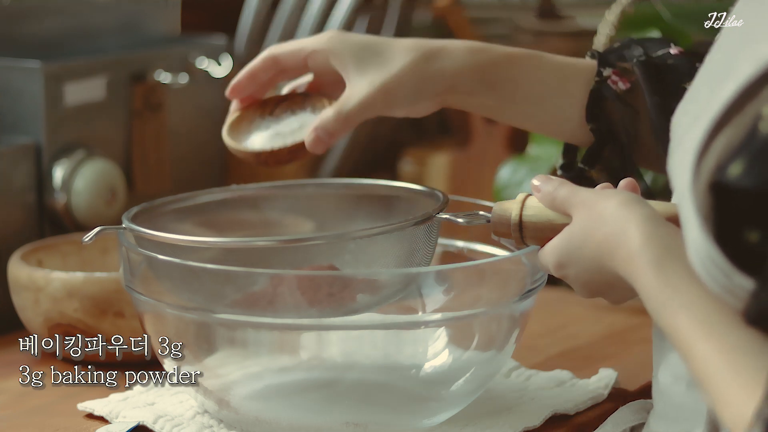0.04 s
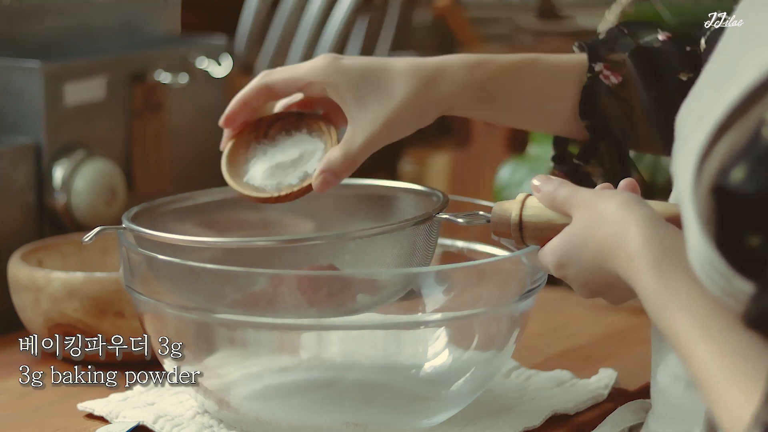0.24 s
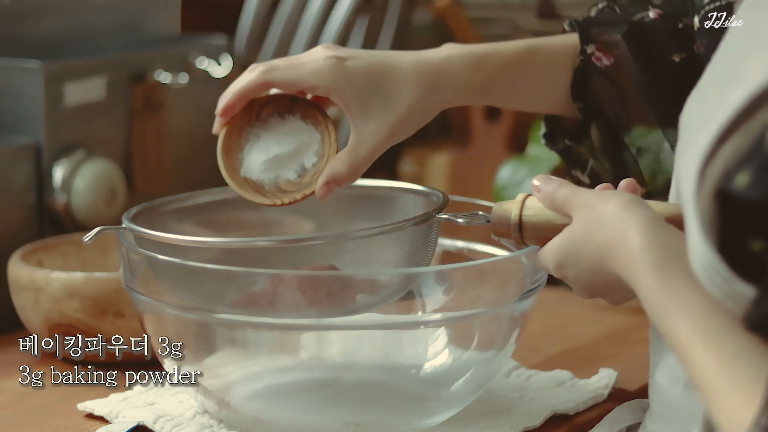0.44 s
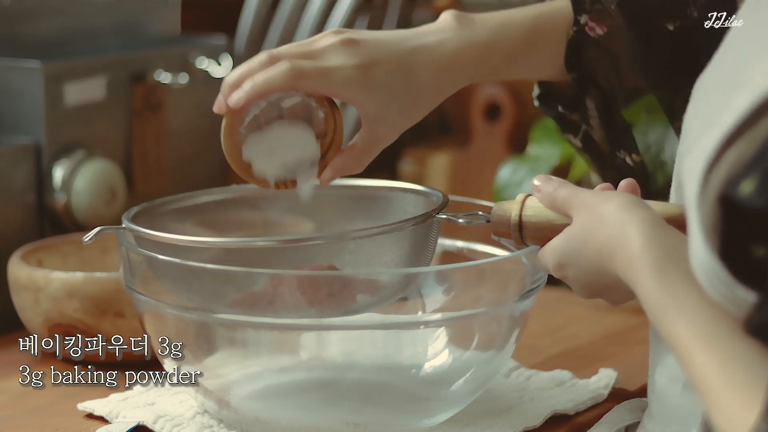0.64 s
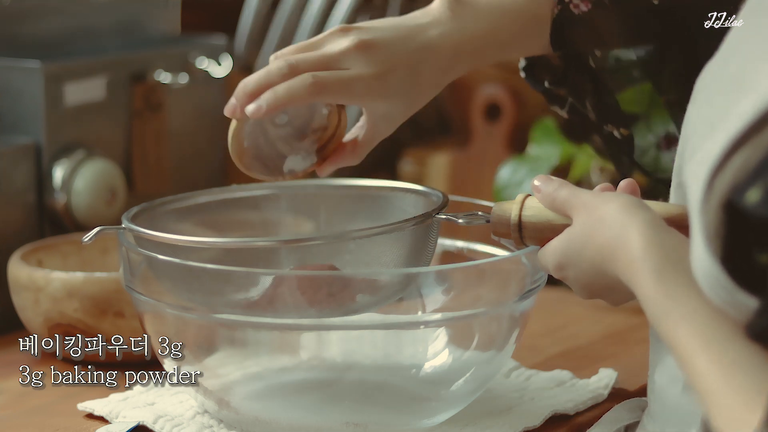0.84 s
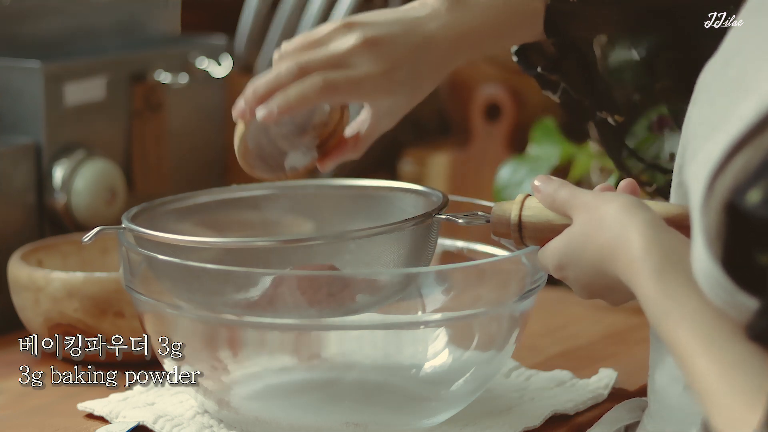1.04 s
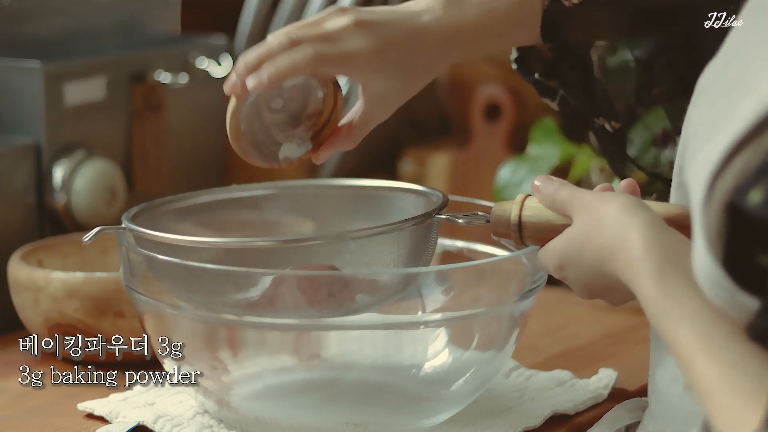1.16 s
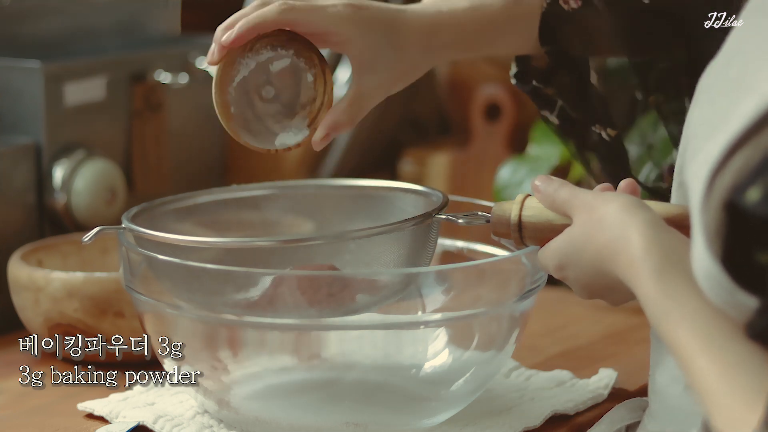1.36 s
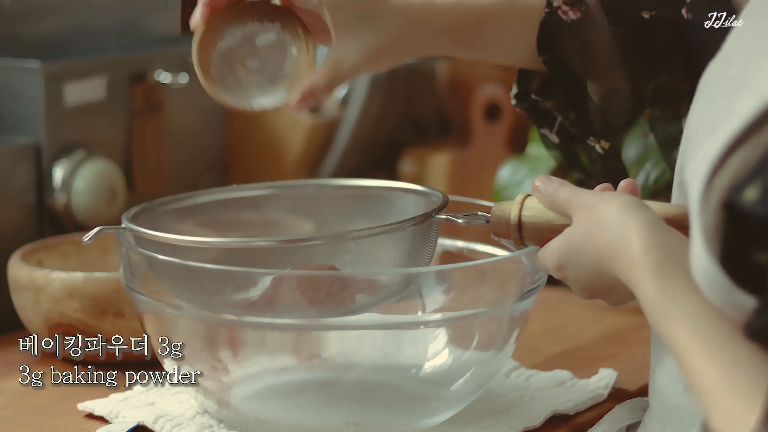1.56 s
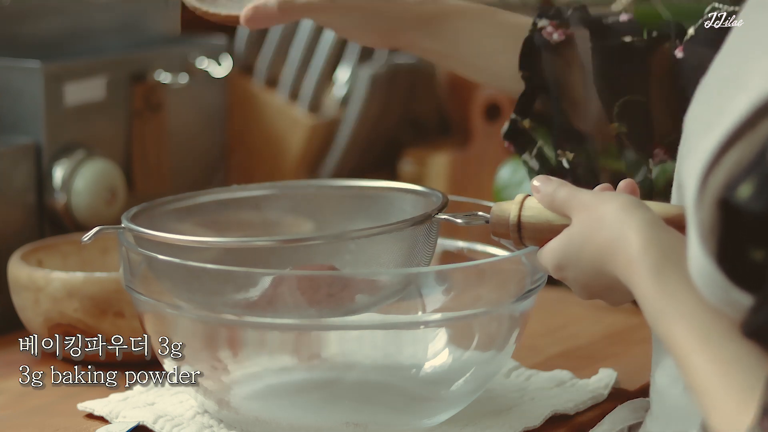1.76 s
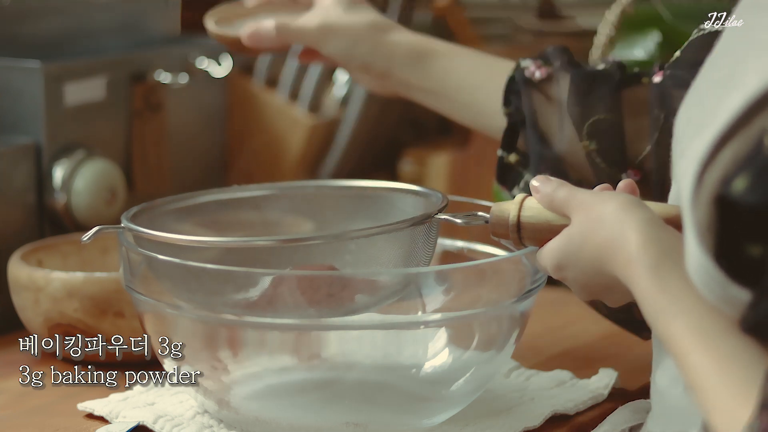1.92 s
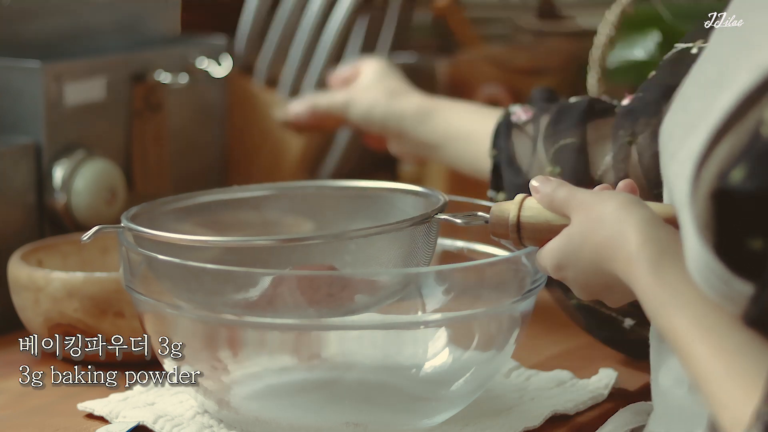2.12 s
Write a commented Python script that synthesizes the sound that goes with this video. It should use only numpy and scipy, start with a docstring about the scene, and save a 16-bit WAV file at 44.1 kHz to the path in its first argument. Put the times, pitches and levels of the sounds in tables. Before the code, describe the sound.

Faint grainy rustles of powder tipped into a sieve, among low knocks on a wooden table.

```python
"""Baking powder is tipped from a small wooden dish into a mesh sieve resting in a glass bowl.
First the powder slides in short grainy rustles, dull knocks boom through the wooden table, and fingers
squeak on the dish and bump it. At one second the powder lands, making sieve and bowl ring.
Then come more knocks, and a thin sleeve swishes as the arm turns. Faint rustles and a few last knocks
follow near two seconds. All along, an appliance hums over the quiet kitchen's low murmur."""
import sys
import numpy as np
from scipy import signal
from scipy.fft import rfft, irfft
from scipy.io import wavfile
from scipy.ndimage import uniform_filter1d

SR = 44100
rng = np.random.default_rng(int(sys.argv[2]) if len(sys.argv) > 2 else 0)


def bounce(signal):
    """Save signal as a 16-bit WAV file at the path given by the first command-line argument."""
    frames = np.transpose(np.atleast_2d(signal))
    limited = np.clip(frames, -1, 1)
    pcm = np.round(limited * 32767).astype(np.int16)
    wavfile.write(sys.argv[1], SR, pcm)


N = 96490

# each slide of powder in the dish (t/s, length/s, level/dB, brightness/dB per octave)
SLIDES = [(0.0, 0.076, -60, 0), (.254, 0.011, -61.5, 1.5), (.27, 0.018, -61, 2.5), (0.311, .01, -60.5, 1),
          (.507, 0.0067, -56.5, 4.5), (.524, 0.018, -59, 2.5), (0.561, 0.062, -65.5, 1),
          (.724, 0.058, -59, 4.5), (0.802, 0.053, -60.5, 3), (.868, 0.02, -65, -0.5),
          (.912, 0.041, -58, 2.5), (0.978, 0.022, -60, 3.5), (1.31, 0.15, -70, -1.5),
          (1.867, 0.062, -71, 4), (1.967, 0.07, -68, 5), (2.043, 0.004, -60, 3.5)]
# the hiss of sliding grains (f/Hz, level/dB)
SLIDE_HISS = [(600, 10), (1300, 3), (2400, -3), (3600, -9.5), (4800, -7.5), (7500, -11), (9500, -22),
              (12500, -19), (15500, -28)]
# where the dish rings in the cupped hand (f/Hz, width/Hz, level/dB)
DISH_RINGS = [(1990, 230, -3), (2470, 260, -1.5), (2950, 130, -0.5), (3430, 360, -1.5), (3975, 270, 0),
              (5970, 120, -8.5)]
def powder_slides():
    """Sliding grains hiss and make the wooden dish ring."""
    hiss = coloured(grains(), SLIDE_HISS)
    dish = from_db(-1) * rms_one(ringing(grains(), DISH_RINGS))
    return bursts(SLIDES, hiss + dish, attack=.006, release=.014)


# each landing of powder in the sieve (t/s, length/s, level/dB, brightness/dB per octave)
LANDINGS = [(.998, 0.044, -52, -2), (1.028, 0.039, -52, 0), (1.082, 0.035, -50.5, -.5)]
# the hiss of grains hitting the mesh (f/Hz, level/dB)
MESH_HISS = [(600, -6), (1200, 0), (1700, -5), (2200, 1), (2800, -4.5), (3800, 2.5), (5500, -4),
             (8000, -10), (12000, -15), (15500, -23)]
# where sieve and bowl ring (f/Hz, width/Hz, level/dB)
SIEVE_RINGS = [(1140, 70, -4), (1403, 60, -7), (2055, 70, -3), (2160, 90, 0), (2498, 50, -3),
               (3060, 90, -7), (3341, 35, 1), (3534, 60, -1), (3843, 45, 5), (3900, 50, 4), (4032, 50, -1),
               (4460, 45, -7)]
def powder_lands():
    """Falling grains hiss on the mesh and set sieve and bowl ringing."""
    hiss = bursts(LANDINGS, coloured(grains(), MESH_HISS), attack=.008, release=.012)
    strikes = bursts(LANDINGS, coloured(grains(), MESH_HISS), attack=.008, release=.012)
    return (hiss + from_db(8) * ringing(strikes, SIEVE_RINGS)) / 2


# each fine spray of powder on the mesh (t/s, length/s, level/dB)
SPRAYS = [(0.36, 0.0069, -59), (.449, .009, -62.5), (0.999, 0.031, -58.5)]
# the hiss of a spray (f/Hz, level/dB)
SPRAY_HISS = [(1000, -4), (2200, 1), (6000, -4.5), (9000, -6.5), (12500, -8.5), (15500, -17)]
def powder_sprays():
    """The finest powder only hisses on the mesh; nothing rings."""
    loudness = sum(from_db(db) * envelope(start, length, attack=.004, release=.0045)
                   for start, length, db in SPRAYS)
    return loudness * coloured(grains(), SPRAY_HISS)


# each dull knock (t/s, level/dB, brightness/dB per octave, extra boom level/dB)
KNOCKS = [(-.01, -41, -1.5, -5.5), (0.238, -49.5, -6, 0.5), (0.374, -60.5, 3.5, 3), (.688, -36, 0.5, -3.5),
          (0.729, -45, 4, -2), (0.783, -44.5, -1, -7), (0.82, -42.5, 3, -13), (0.862, -44, -0.5, -6.5),
          (.906, -43, -6, -7), (1.215, -43, -4.5, -6), (1.27, -45, -19, -5), (1.698, -76, -6, -5),
          (1.992, -33.5, 1, -5), (2.033, -42, 0.5, -3), (2.097, -40, -1, 0), (2.13, -52, -3, -8)]
# the wooden table's own low notes (f/Hz, level/dB, time to fade by 60 dB/s)
TABLE_NOTES = [(91, -8, .7), (114.7, 0, .33), (142, -4, .16), (166, -6, .18), (230, -9, .17),
               (266, -14, .15)]
# the boom in the room (f/Hz, level/dB)
ROOM_BOOM = [(70, 0), (110, 7), (160, -3), (240, -4.5), (320, -16), (500, -24.5), (1000, -47)]
def table_knocks():
    """Each soft push rings the table's low notes and leaves a short boom in the room."""
    push_s, boom_rise_s = .0038, .011
    main_hz = TABLE_NOTES[1][0]
    boom_spectrum = rfft(coloured(white(), ROOM_BOOM))
    out = 0
    for start, db, brightness, boom_db in KNOCKS:
        t = np.maximum(np.arange(N) / SR - start, 0)
        push = from_db(db - 1) * (1 - np.exp(-t / push_s))
        for hz, note_db, fade_s in TABLE_NOTES:
            fading_db = note_db + brightness * np.log2(hz / main_hz) - 60 * t / fade_s
            out += push * from_db(fading_db) * np.sin(2 * np.pi * hz * t)
        boom = evened(tilted(boom_spectrum, brightness), samples=1500)
        swell = envelope(start + boom_rise_s / 2, length=.023, attack=boom_rise_s, release=.044)
        out += from_db(db + boom_db) * swell * boom
    return signal.sosfilt(signal.butter(4, [82, 830], "band", fs=SR, output="sos"), out)


# each swish of the sleeve (t/s, length/s, level/dB, pitch/ratio, boost of all but the lowest ring/dB)
SWISHES = [(1.305, .04, -70.5, 1, 4), (1.36, 0.048, -74, 1, 0), (1.41, 0.078, -67.5, 0.99, 0),
           (1.498, 0.024, -68, 1, -2), (1.592, 0.018, -72, 1, -14), (1.865, 0.051, -67, 0.99, -2),
           (1.982, .065, -76.5, 0.96, 7)]
# where the woven cloth rings (f/Hz, width/Hz, level/dB)
CLOTH_RINGS = [(6200, 340, 0), (8050, 440, -4), (10400, 350, -12), (11600, 450, -11), (13050, 450, -13)]
def sleeve_swishes():
    """Thin cloth rubs unevenly, ringing at a few high pitches that shift a little between strokes."""
    rubbing = signal.sosfilt(signal.butter(2, 4500, "high", fs=SR, output="sos"), white())
    out = 0
    for start, length, db, pitch, boost_db in SWISHES:
        swish = sum(from_db(ring_db + boost_db * (k > 0)) * resonate(rubbing, hz * pitch, width)
                    for k, (hz, width, ring_db) in enumerate(CLOTH_RINGS))
        out += from_db(db) * envelope(start, length, attack=.016, release=.016) * rms_one(swish)
    flutter_db = 1.5 * drift(rate_hz=25)
    return out * from_db(flutter_db)


# each thin squeak (t/s, length/s, level/dB, brightness/dB per octave)
SQUEAKS = [(.435, 0.18, -73, 13), (.708, 0.082, -62.5, 2.5)]
# the pitches in a squeak (f/Hz, width/Hz, level/dB)
SQUEAK_PITCHES = [(4575, 120, 0), (6400, 900, -9), (7880, 480, -4.5), (11580, 350, -16)]
def finger_squeaks():
    """Skin rubs on the dish and squeaks faintly as the dish is turned over."""
    squeak = sum(from_db(db) * pitched_noise(hz, width) for hz, width, db in SQUEAK_PITCHES)
    return bursts(SQUEAKS, squeak, attack=.03, release=.01)


def finger_bump():
    """A finger bumps the dish once, with a short, dull tap."""
    loudness = from_db(-52) * envelope(start=.871, length=.008, attack=.002, release=.024)
    return loudness * pitched_noise(hz=535, width_hz=170)


# the tones of the appliance (f/Hz, level/dB)
HUM_TONES = [(231, -62), (384, -66), (489, -72.5), (618, -72), (655, -72.5), (857, -74), (981, -79),
             (1101, -80), (1160, -102.5), (1830, -85)]
def appliance_hum():
    """An appliance hums; each tone wavers a little in pitch and loudness."""
    wander_hz, flutter_db = 2.48, 2.5
    hum = 0
    for hz, db in HUM_TONES:
        loudness = from_db(db + flutter_db * drift(rate_hz=4.2))
        cycles = np.cumsum(hz + wander_hz * drift(rate_hz=6.3)) / SR + rng.random()
        hum += loudness * np.sin(2 * np.pi * cycles)
    return np.sqrt(2) * hum


# the kitchen's background noise (f/Hz, level/dB)
MURMUR = [(25, -15.5), (55, -4), (100, -2.5), (170, -0.5), (240, 1.5), (380, -3.5), (560, -12), (1000, -16),
          (1500, -23), (2600, -29), (4000, -29), (6000, -35), (9000, -36), (13000, -37), (15500, -39.5)]
def room_murmur():
    """The room murmurs, low and steady."""
    return from_db(-53) * coloured(white(), MURMUR)


def from_db(db):
    """Turn decibels into a number to multiply by."""
    return 10 ** (np.asarray(db) / 20)


def rms_one(x):
    """Scale a sound so its average strength (rms) is 1."""
    return x / np.sqrt(np.mean(x ** 2) + 1e-20)


def evened(x, samples):
    """Even out the loudness, averaging over this many samples."""
    return x / np.sqrt(uniform_filter1d(x ** 2, size=samples) + 1e-6)


def white():
    """Plain hiss, equally strong at all frequencies."""
    return rng.standard_normal(N)


def grains(per_second=9000):
    """Many tiny hits of uneven size, at random times."""
    size_db = np.minimum(rng.exponential(1, N), 4)
    hits = from_db(size_db) * rng.choice([-1, 1], N)
    return hits * (rng.random(N) < per_second / SR)


def frequencies():
    """The frequency of each point in a spectrum, in Hz."""
    return np.maximum(np.arange(N // 2 + 1) * SR / N, 1)


def coloured(x, points):
    """Shape a sound's lows and highs to follow a table, fading away below its first row."""
    hz, db = np.transpose(points)
    gain = from_db(np.interp(np.log(frequencies()), np.log(hz), db))
    low_fade = np.minimum(frequencies() / hz[0], 1) ** 2
    return rms_one(irfft(rfft(x) * gain * low_fade, N))


def tilted(spectrum, db_per_octave):
    """Turn a spectrum into a brighter or duller sound; the slope runs from 82 to 9000 Hz."""
    octaves = np.log2(np.clip(frequencies(), 82, 9000))
    return rms_one(irfft(spectrum * from_db(db_per_octave * octaves), N))


def resonate(x, hz, width_hz):
    """Let a sound ring at one pitch; a smaller width rings longer."""
    r = np.exp(-np.pi * width_hz / SR)
    feedback = [1, -2 * r * np.cos(2 * np.pi * hz / SR), r * r]
    return signal.lfilter(np.array([1, 0, -1]) * (1 - r * r) / 2, feedback, x)


def ringing(x, rings):
    """An object rings at several pitches at once; every second one is flipped in sign."""
    return sum(from_db(db) * resonate(x, hz, width) * (-1) ** k
               for k, (hz, width, db) in enumerate(rings))


def pitched_noise(hz, width_hz):
    """Steady noise gathered around one pitch."""
    band = resonate(resonate(white(), hz, width_hz), hz, 2 * width_hz)
    return evened(rms_one(band), samples=700)


def envelope(start, length, attack, release):
    """Loudness that rises (attack), holds, then dies away (release); times in seconds."""
    t = np.arange(N) / SR - start
    return np.clip(t / attack + .5, 0, 1) * np.exp(-np.maximum(t - length, 0) / release)


def bursts(rows, sound, attack, release):
    """Play a sound in short bursts, each with its own level and brightness."""
    spectrum = rfft(sound)
    return sum(from_db(db) * envelope(start, length, attack, release) * tilted(spectrum, brightness)
               for start, length, db, brightness in rows)


def drift(rate_hz):
    """A slow random wobble, about 1 in size."""
    return rms_one(irfft(rfft(white()) / (1 + (frequencies() / rate_hz) ** 2), N))


def scene():
    """Add all the sounds into one channel."""
    powder = powder_slides() + powder_lands() + powder_sprays()
    handling = table_knocks() + sleeve_swishes() + finger_squeaks() + finger_bump()
    return (powder + handling + appliance_hum() + room_murmur())[None]


def record(dry):
    """Cut the highest treble steeply, above 15700 Hz."""
    return signal.sosfilt(signal.ellip(12, .1, 70, 15700, fs=SR, output="sos"), dry)


dry = scene()
out = record(dry)
bounce(out)
```